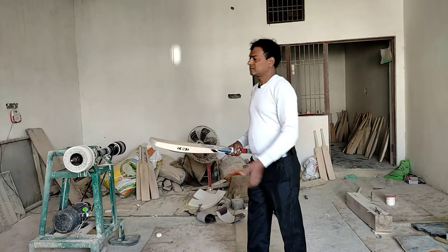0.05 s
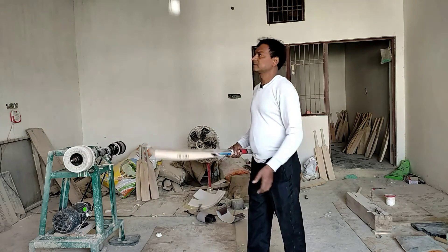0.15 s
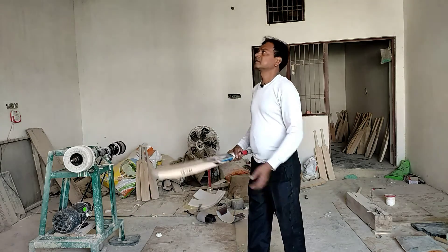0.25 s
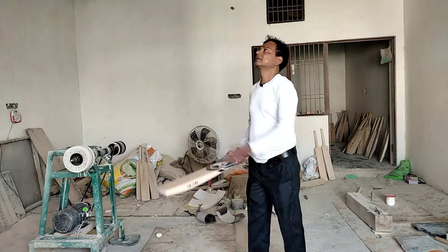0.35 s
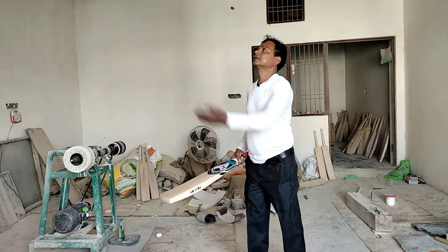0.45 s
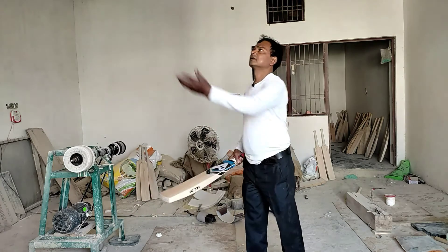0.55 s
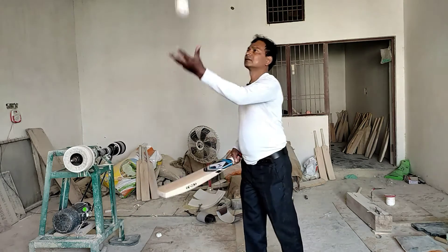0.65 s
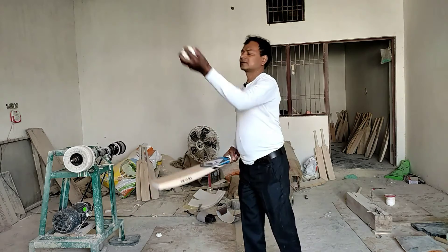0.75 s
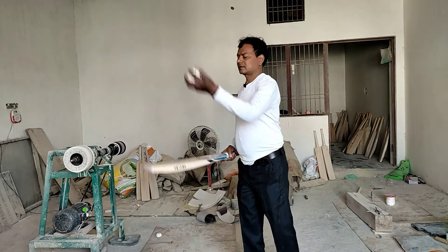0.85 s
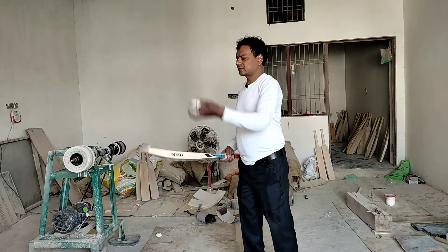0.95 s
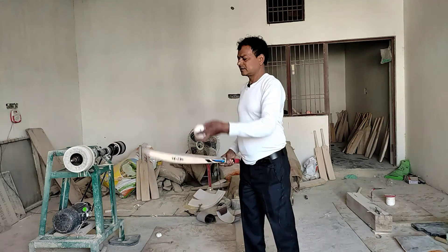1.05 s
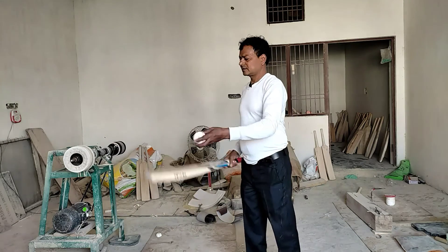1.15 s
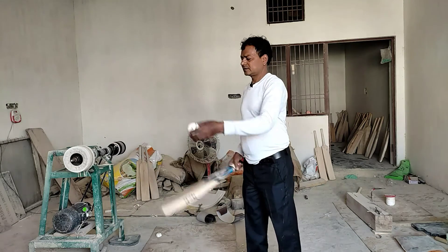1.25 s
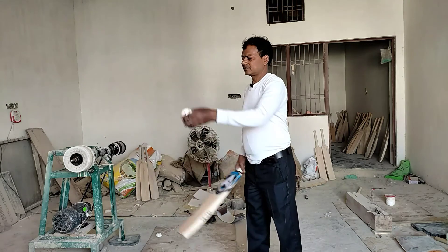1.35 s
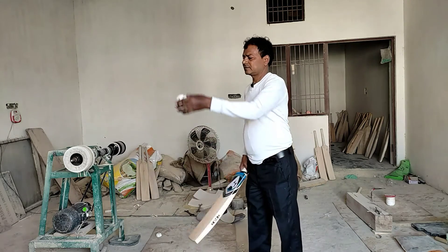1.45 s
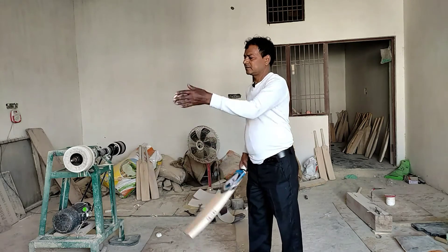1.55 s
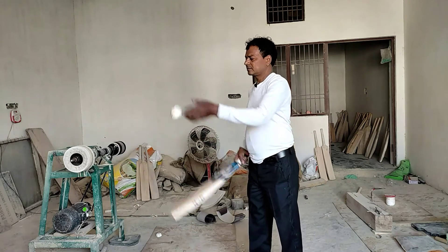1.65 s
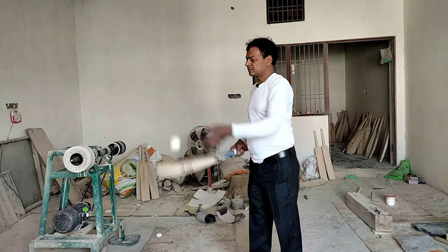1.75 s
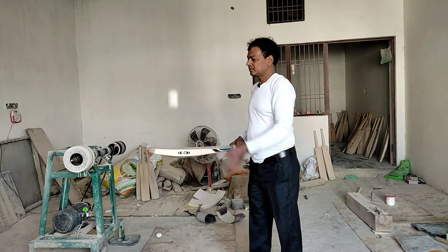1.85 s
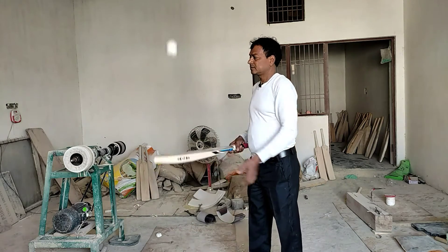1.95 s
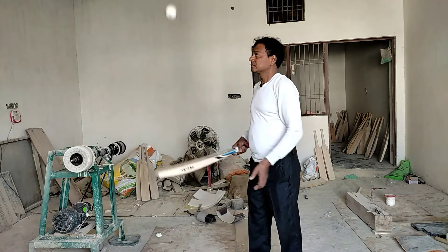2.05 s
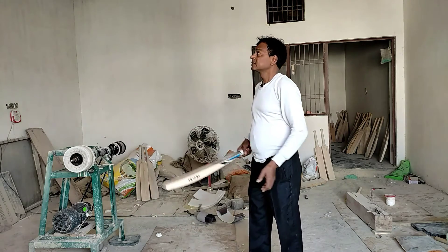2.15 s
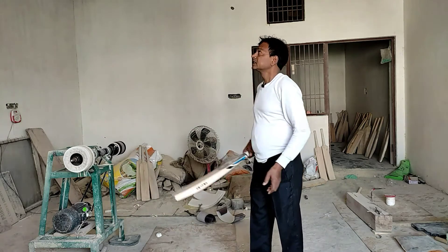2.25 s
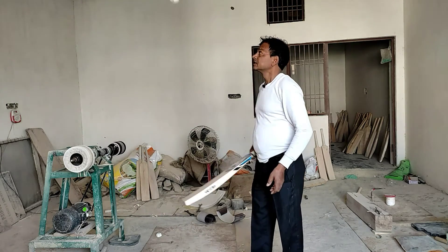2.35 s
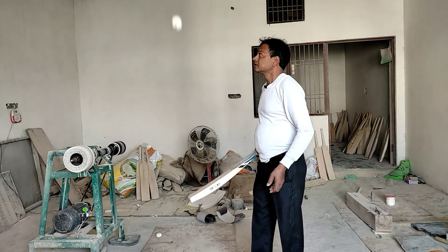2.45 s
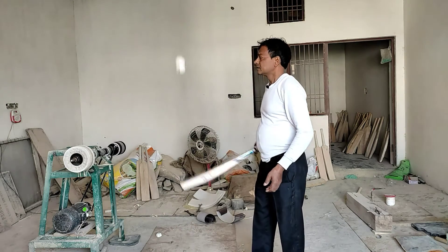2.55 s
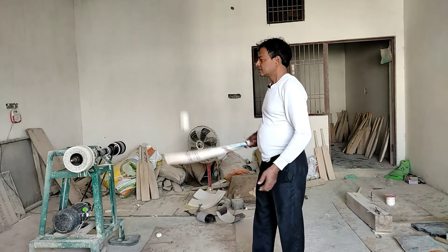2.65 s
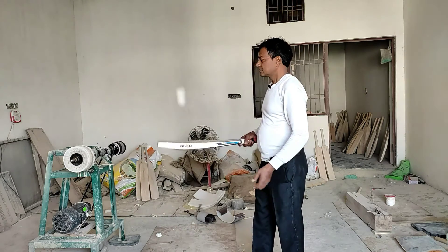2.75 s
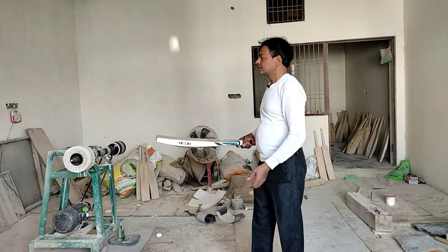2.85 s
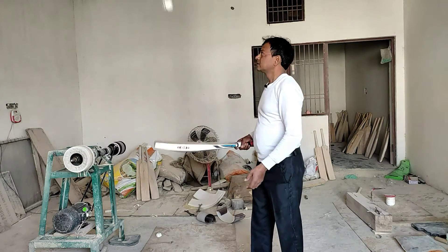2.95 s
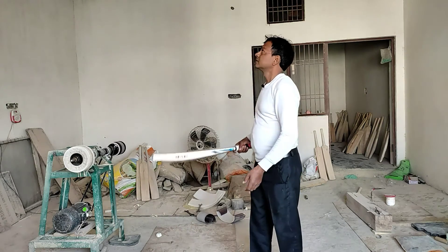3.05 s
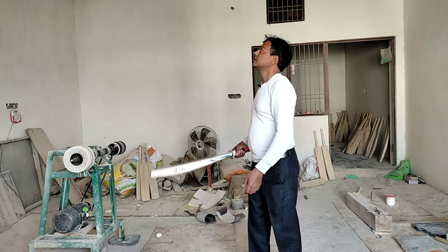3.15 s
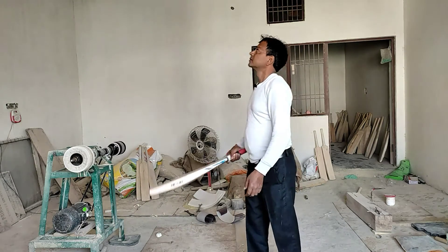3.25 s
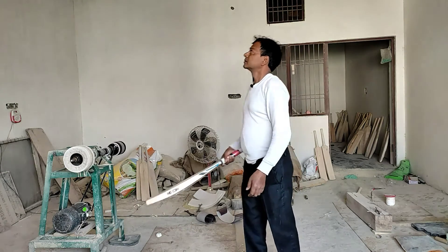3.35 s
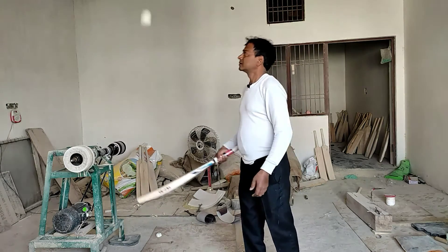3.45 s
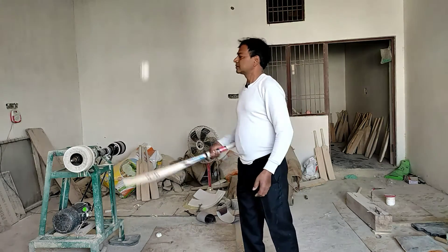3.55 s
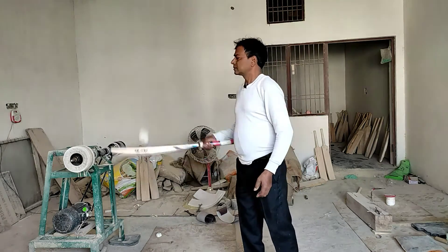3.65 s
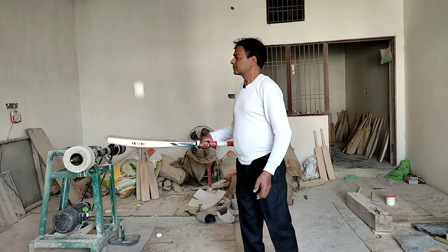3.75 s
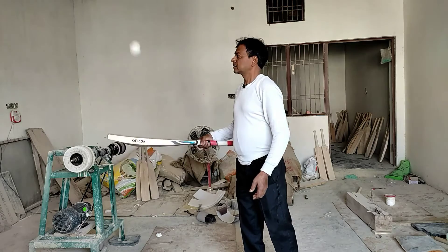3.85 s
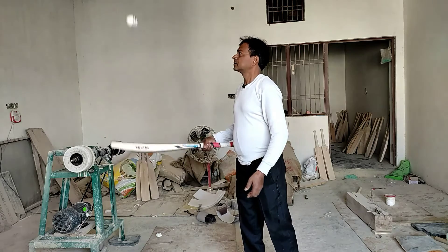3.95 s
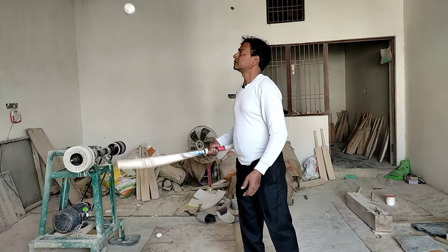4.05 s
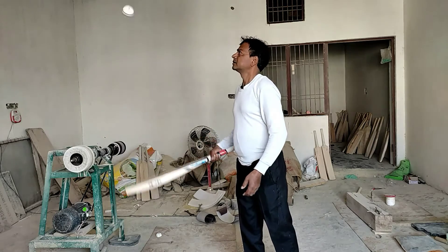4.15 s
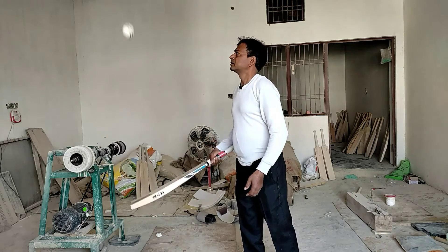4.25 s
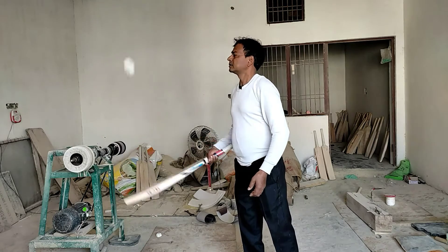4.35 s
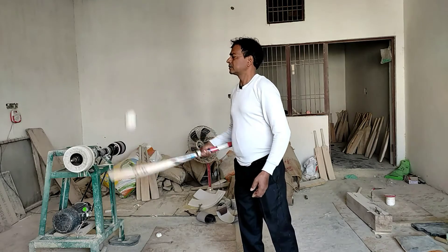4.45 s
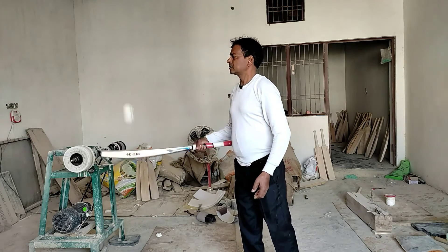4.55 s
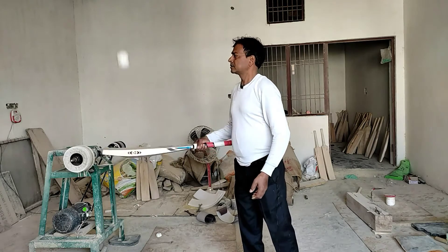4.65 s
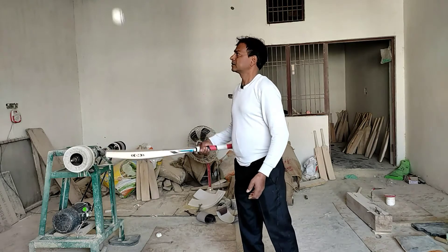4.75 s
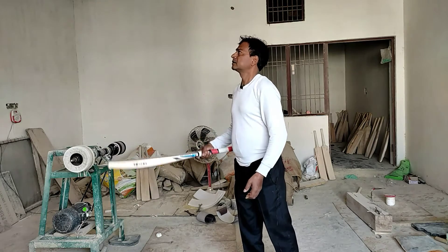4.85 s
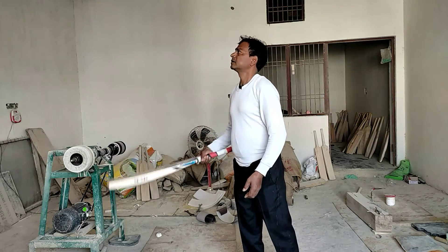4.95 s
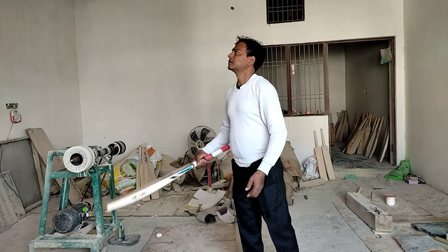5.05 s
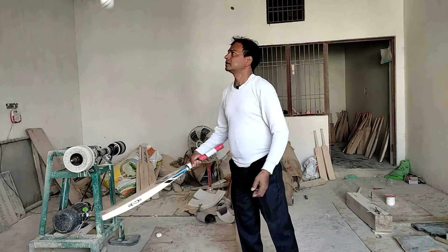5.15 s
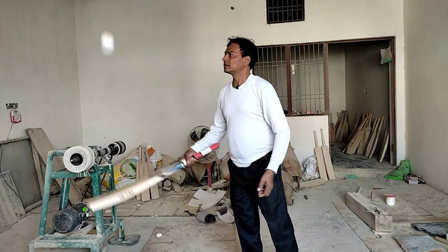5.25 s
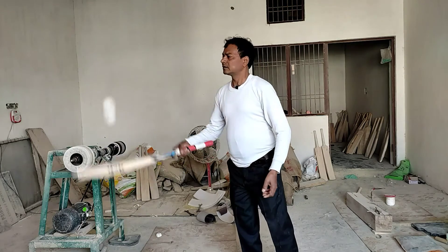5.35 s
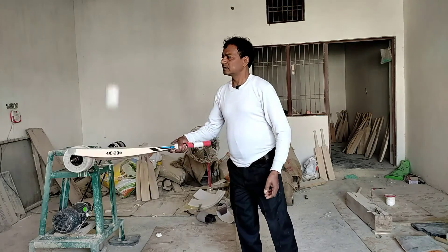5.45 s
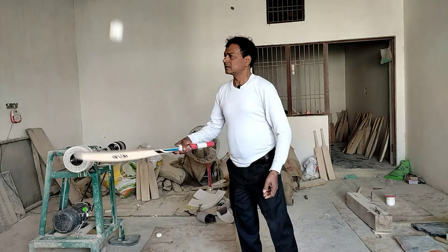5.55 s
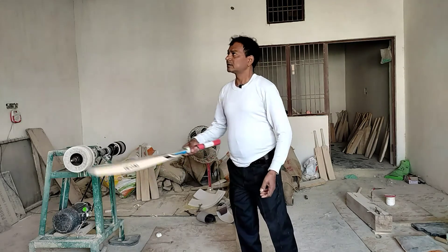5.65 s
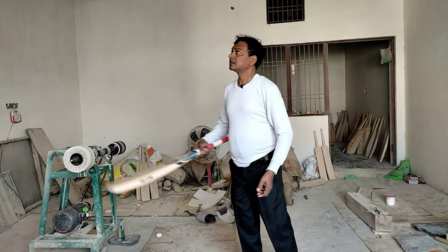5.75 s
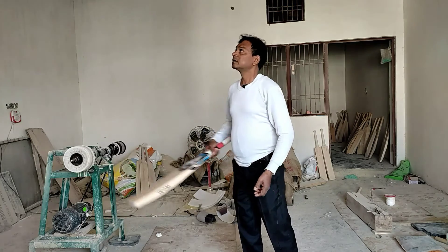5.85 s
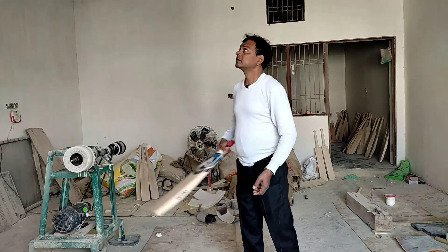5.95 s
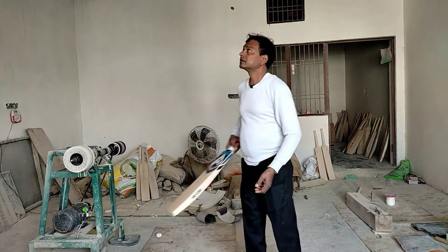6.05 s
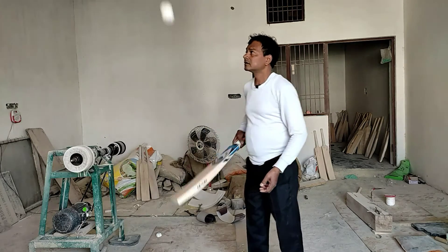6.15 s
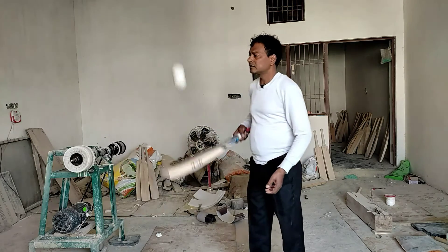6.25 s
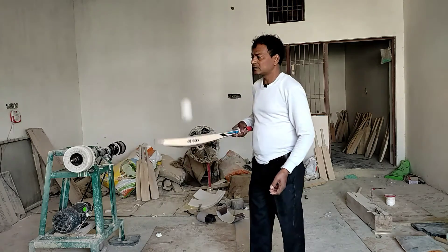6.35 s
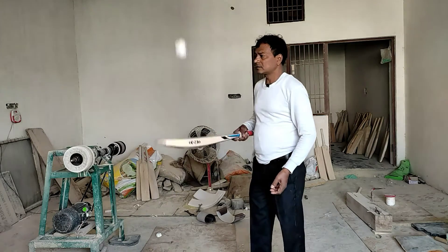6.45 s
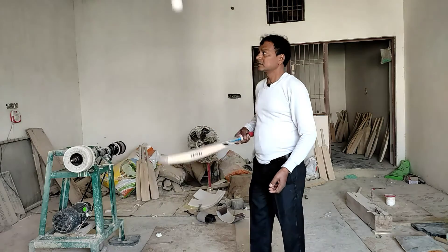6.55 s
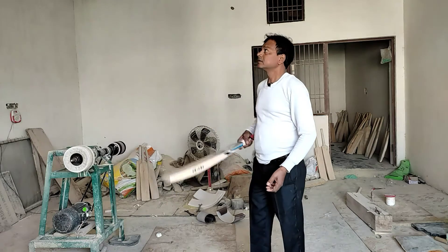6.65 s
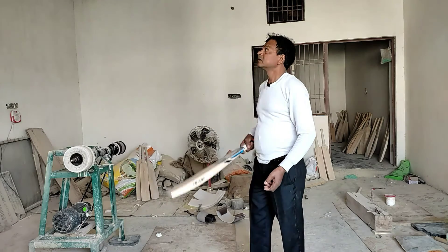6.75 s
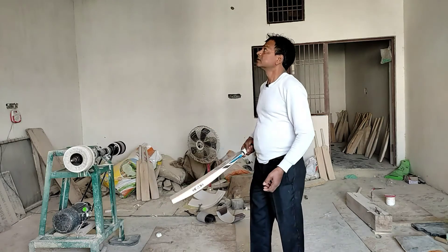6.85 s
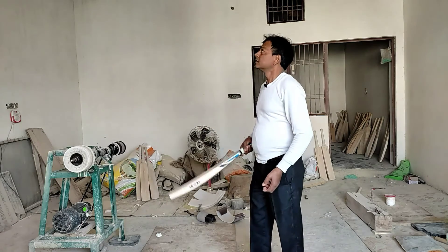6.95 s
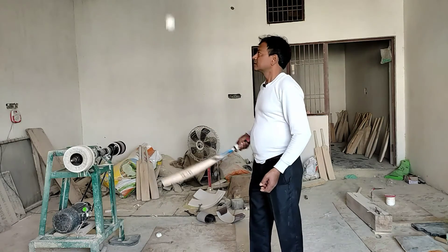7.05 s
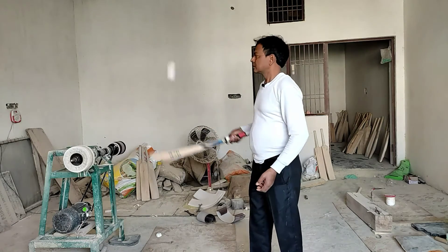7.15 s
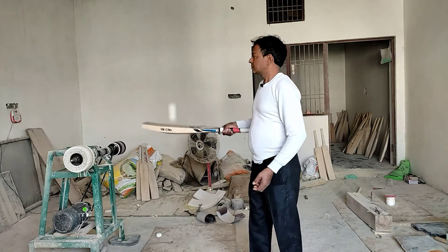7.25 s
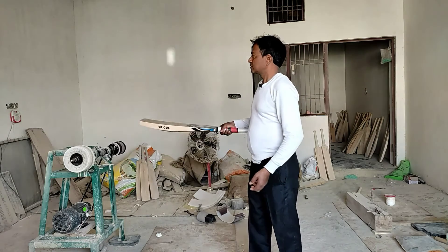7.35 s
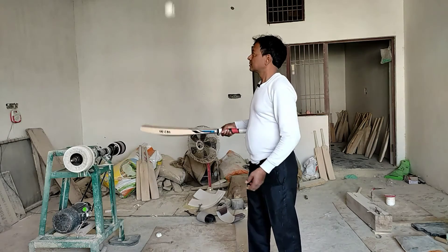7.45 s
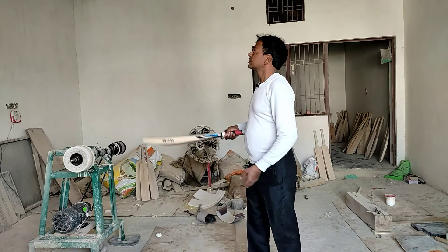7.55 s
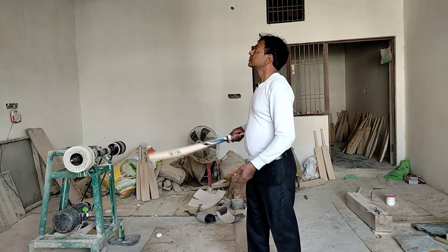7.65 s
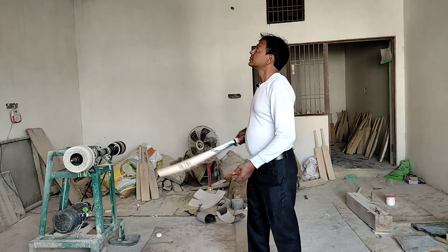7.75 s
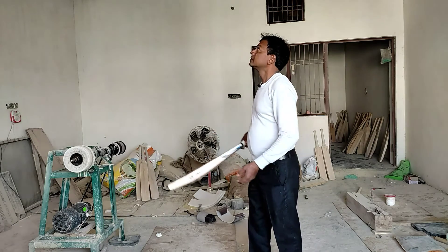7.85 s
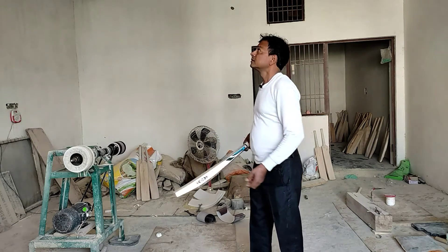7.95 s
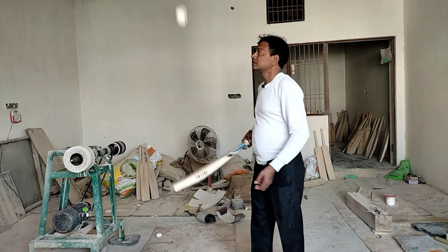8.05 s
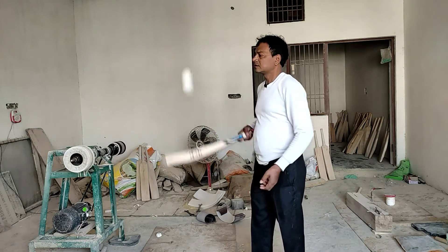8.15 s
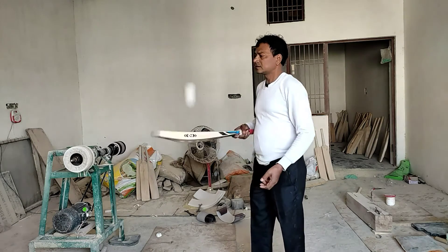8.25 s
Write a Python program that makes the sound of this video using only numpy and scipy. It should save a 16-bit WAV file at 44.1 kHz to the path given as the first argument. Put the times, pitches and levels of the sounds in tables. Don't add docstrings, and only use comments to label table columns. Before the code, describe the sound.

Loud, woody ball-on-bat knocks, first one alone, then about one a second, each followed by a swelling room echo over quiet hiss and distant machine whine.

```python
import sys
import numpy as np
from scipy import signal
from scipy.fft import rfft, irfft
from scipy.io import wavfile
from scipy.ndimage import uniform_filter1d, map_coordinates

SR = 44100
rng = np.random.default_rng(int(sys.argv[2]) if len(sys.argv) > 2 else 0)


def inscribe(sig):
    pcm = np.round(np.clip(np.atleast_2d(sig).T, -1, 1) * 32767)
    wavfile.write(sys.argv[1], SR, pcm.astype(np.int16))


def gain_from_db(level_db):
    decades = np.asarray(level_db, float) / 20
    return 10 ** decades


N = 365148

# (first touch [s], limiter lets go [s])
KNOCK_TIMES = [
    (.0685, .165),
    (1.9465, 2.034),
    (2.8554, 2.939),
    (3.8279, 3.93),
    (4.6694, 4.765),
    (5.5631, 5.649),
    (6.4918, 6.576),
    (7.4058, 7.5),
]
# (blow [dB], contact [ms], blade pitch factor [1], surface crack [dB], room share [dB])
KNOCKS = [
    (-4.5, 1.42, 1.12, -25.5, -12.5),
    (-4, 1.333, 1.14, -26, -12.5),
    (0.5, 1.254, 1.126, -25.5, -12.5),
    (-3, 1.336, 1.074, -25, -10.5),
    (-4, 1.344, 1.147, -23.5, -10.5),
    (-4, 1.374, 1.08, -28.5, -10.5),
    (1, 1.36, 1.08, -28.5, -14.5),
    (-1, 1.425, 1.1, -22, -13),
]
# (frequency [Hz], level [dB])
BALL = [
    (2500, -16),
    (2650, -11),
    (2650, -6),
    (2300, -13),
    (2650, -12),
    (2600, -22),
    (2600, -22),
    (2450, -9),
]
OVERSHOOT_DB = [2.2, 3.24, 3.8, 2.05, 2.23, 2.3, 2.85, 2.45]
# (frequency [Hz], level [dB], t60 [s])
BLADE_MODES = [(277, -7.5, 0.013), (643, -1, 0.012), (960, 11, 0.008), (1134.5, 5, 0.012),
               (1750, -7, 0.006)]
# (delay [ms], level [dB], sign [1])
ECHOES = [(-3.8, -36, 1), (-.5, -16, -1), (3.3, -19, 1), (5.3, -11, -1), (8.2, -22, 1), (10.8, -15, 1),
          (18, -17, -1), (21, -19, 1), (28, -19, 1)]
# (frequency [Hz], level [dB], t60 [s])
ROOM = [(45, -13, 0.96), (73.6, -16, 0.45), (96.1, 1.5, 2.17), (153, 1.5, 0.96), (195, -4, 1.39),
        (240, -1.5, 1.2), (429, 0.5, 1.091), (926, -8, 0.78), (1140, -9.5, 0.83), (1730, -5, 0.71),
        (2860, -6.5, 0.68), (4050, -10.5, 0.53), (8150, -12, 0.51), (15100, -3, 0.15)]
# (time [s], peak [dB], centre [Hz], t60 [s])
TICKS = [
    (0.883, -46.5, 4900, 0.015),
    (0.883, -41.5, 12500, 0.0077),
    (.912, -59, 9000, .02),
    (1.046, -64, 1500, .05),
    (1.113, -58, 9500, 0.018),
    (1.121, -53.5, 8400, 0.03),
    (1.14, -63, 9500, .04),
    (2.197, -52.5, 5140, 0.012),
    (3.196, -53, 4520, 0.011),
    (7.341, -47, 6470, 0.01),
]
# (time [s], level [dB], contact [ms])
THUDS = [
    (1.032, -14.5, 1.2),
    (6.165, -9, 1.47),
]
# (time of peak [s], peak [dB], rise [s], t60 [s])
RUSTLES = [
    (.6, -58, 0.23, 0.59),
    (.78, -65, .1, 0.38),
    (.886, -54.5, 0.0069, 0.16),
    (1.035, -56, 0.0095, 1.14),
    (1.365, -93, .01, 0.31),
    (6.172, -58, .015, 1.4),
]
# (frequency [Hz], density [dB per Hz])
RUSTLE_COLOUR = [(150, -12), (400, -2), (900, -.5), (1500, -2), (2500, -7), (3600, -13), (6000, -22),
                 (12000, -26)]
# (frequency [Hz], width [Hz], level [dB])
WHINE = [(109, 12, -72), (484, 6.1, -72.5), (805, 20, -71.5), (1209, 40, -71), (1576, 56, -74.5),
         (4420, 210, -73.5), (4630, 87, -72.5), (5490, 150, -73.5), (5930, 260, -76), (7710, 160, -77)]
# (frequency [Hz], width [Hz], level [dB])
UPPER_WHINE = [(6330, 85, -84), (7190, 290, -82), (8700, 340, -89.5)]
# (time [s], level [dB])
LOAD = [(0, 1), (1.6, 6), (2.9, 10.5), (3.4, 7), (4.36, 13), (5.5, 7), (6.3, 11.5), (7.1, 7.5),
        (8.28, 11.5)]
# (start [s], length [s], frequency [Hz], level [dB])
DRONES = [
    (1.1, .85, 528, -70),
    (1.2, .75, 818, -73),
    (2.58, .3, 1190, -67),
    (2.5, .4, 1540, -73),
]
# (time [s], level [dB])
RUMBLE = [(0.0, -44.5), (0.34, -47), (1.04, -42.5), (1.33, -41.5), (1.84, -49), (2.37, -43.5), (2.97, -53),
          (3.76, -47.5), (4.66, -52), (5.07, -45.5), (5.65, -51.5), (6.23, -43), (7.68, -52.5),
          (8.28, -48.5)]
# (frequency [Hz], density [dB per Hz])
RUMBLE_COLOUR = [(8, -26), (14, 25), (28, -37), (50, 1.5), (75, -8), (105, -22), (150, -14.5), (260, -44)]
# (frequency [Hz], density [dB per Hz])
HISS_COLOUR = [(90, -1), (130, 1), (300, 1), (550, -7.5), (900, -2.5), (1500, -4.5), (2200, -11),
               (3100, -12.5), (4200, -11.5), (5500, -14), (7400, -20), (8200, -24), (12000, -25.5),
               (15900, -29)]

DRIVE_DB, ROOM_DB = 17.7, 18.5
BUILD_MS = 13.7
ECHO_BLUR_MS = 0.21
SNAP_HZ, BALL_T60_S, GRIT_TOP_HZ, GRIT_S = 1500, 0.021, 10000, 0.00055
SAG_S, SAG_SHARE, SAG_BACK_S = 5.62, 0.06, 0.3
LOOK_AHEAD_MS, RECOVERY_MS, CLIP_KNEE, TREBLE_END_HZ = 9.3, 1.8, 14, 15400


def ball_on_bat():
    out = np.zeros(N)
    common, *tails = reverb(count=len(KNOCKS) + 1)
    blur = np.exp(-1000 / (ECHO_BLUR_MS * SR))
    for (s, _), setting, (ball_hz, ball_db), own in zip(KNOCK_TIMES, KNOCKS, BALL, tails):
        db, contact_ms, pitch, crack_db, room_db = setting
        blow, push = gain_from_db(db + DRIVE_DB) * np.array(knock(contact_ms, pitch))
        snap, grit, ring = gain_from_db(db + DRIVE_DB + crack_db) * np.array(crack(ball_hz, ball_db))
        room_db = ROOM_DB + room_db
        add(out, s, gain_from_db(room_db) * signal.fftconvolve(blow, 0.79 * common + 0.83 * own))
        add(out, s, gain_from_db(room_db + 16) * signal.fftconvolve(snap, own - common))
        add(out, s, gain_from_db(room_db + 7) * signal.fftconvolve(ring, own + common))
        add(out, s, blow - gain_from_db(-16) * push)
        add(out, s, grit + gain_from_db(8) * ring)
        dull = signal.lfilter([1 - blur], [1, -blur], blow)
        chance = rng.standard_normal((len(ECHOES), 2)) * (0.03, 1.5)
        for (ms, echo_db, sign), (late, loud_db) in zip(ECHOES, chance):
            arrival = s + ms / 1000 * (1 + late)
            add(out, arrival, sign * gain_from_db(echo_db + loud_db) * (dull if ms > 0 else blow))
            add(out, arrival, sign * gain_from_db(echo_db + 2 * loud_db - 10) * grit)
    return out


def knock(contact_ms, pitch):
    t = np.arange(3000) / SR
    push = np.sin(np.pi * np.clip(t * 1000 / contact_ms, 0, 1)) ** 2.645
    ring = sum(gain_from_db(db) * np.cos(2 * np.pi * hz * pitch * t) * decay(t, t60) for hz, db, t60 in BLADE_MODES)
    blow = -np.convolve(np.gradient(push), ring)[:len(t)]
    return blow / np.max(np.abs(blow)), push


def crack(ball_hz, ball_db):
    t = np.arange(1200) / SR
    snap = np.exp(-t * 2 * np.pi * SNAP_HZ)
    noise = signal.lfilter(*signal.butter(2, GRIT_TOP_HZ, fs=SR), rng.standard_normal(len(t)))
    grit = gain_from_db(3) * noise * np.exp(-t / GRIT_S)
    ring = gain_from_db(ball_db - 6) * np.sin(2 * np.pi * ball_hz * t) * decay(t, BALL_T60_S)
    return snap, grit, ring


def reverb(count, size=50000):
    t, f = np.arange(size) / SR, np.fft.rfftfreq(size, 1 / SR) + 1
    noise = rfft(rng.standard_normal((count, size))) / np.sqrt(SR / 2)
    out = 0
    for hz in 40 * 2 ** np.arange(0, 8.7, 1 / 3):
        band = irfft(noise * np.clip(1 - 3 * np.abs(np.log2(f / hz)), 0, 1), size)
        t60 = curve(ROOM, hz, column=2, log=True)
        out = out + band * decay(t, t60) * gain_from_db(curve(ROOM, hz, log=True))
    return out * (1 - np.exp(-(t * 1000 / BUILD_MS) ** 2))


def ticks():
    out, t = np.zeros(N), np.arange(2000) / SR
    for s, db, hz, t60 in TICKS:
        grain = shaped(lambda f: 1 / (1 + (2.2 * np.log2((f + 1) / hz)) ** 2), size=len(t))
        add(out, s - 0.001, gain_from_db(db + 4.5) * grain * decay(t, t60))
    return out + gain_from_db(-19) * signal.fftconvolve(out, reverb(count=1)[0])[:N]


def rustle():
    t, gate = np.arange(N) / SR, 0
    for s, db, rise, t60 in RUSTLES:
        fall_db = 60 * np.maximum(t - s, 0) / t60
        gate = gate + gain_from_db(db - fall_db) * np.clip(1 + (t - s) / rise, 0, 1)
    return gate * gain_from_db(3 + 2 * walk(90)) * coloured(RUSTLE_COLOUR)


def far_thuds():
    far = np.zeros(N)
    for s, db, contact_ms in THUDS:
        add(far, s, gain_from_db(db) * knock(contact_ms, pitch=0.99)[0])
    return signal.fftconvolve(far, reverb(count=1)[0])[:N]


def machine():
    t = np.arange(N) / SR
    whine = sum(gain_from_db(db + 1.6 * walk(1.5)) * band_noise(hz, width) for hz, width, db in WHINE)
    upper = sum(gain_from_db(db + 1.7 * walk(3.7)) * band_noise(hz, width) for hz, width, db in UPPER_WHINE)
    speed = 1 - SAG_SHARE * (t > SAG_S) * np.exp(-((t - SAG_S) / SAG_BACK_S) ** 2)
    upper = map_coordinates(upper, [np.cumsum(speed) - 1], mode="mirror")
    return whine + gain_from_db(curve(LOAD, t)) * upper


def street():
    t = np.arange(N) / SR
    out = gain_from_db(curve(RUMBLE, t) + 3 + 1.1 * walk(23)) * coloured(RUMBLE_COLOUR)
    for s, span, hz, db in DRONES:
        swell = np.sqrt(2 * np.sin(np.pi * np.clip((t - s) / span, 0, 1)) + 1e-12)
        tone = np.sin(2 * np.pi * hz * np.cumsum(1 + 0.00445 * walk(2.7)) / SR)
        out += gain_from_db(db + 2 * walk(10)) * swell * tone
    return out


def hiss():
    return gain_from_db(-57 + 0.6 * walk(3)) * coloured(HISS_COLOUR)


def decay(t, t60):
    return np.exp(-np.log(1000) * t / t60)


def band_noise(hz, width):
    return shaped(lambda f: 1 / (1 + (2 * (f - hz) / width) ** 2))


def coloured(table):
    return shaped(lambda f: gain_from_db(curve(table, f, log=True)) * (f > table[0][0]) * (f < table[-1][0]))


def shaped(gain_at, size=N):
    y = irfft(rfft(rng.standard_normal(size)) * gain_at(np.fft.rfftfreq(size, 1 / SR)), size)
    return y / np.std(y)


def walk(rate):
    k = int(SR / rate)
    held = np.repeat(rng.standard_normal(N // k + 1), k)
    return 1.25 * uniform_filter1d(uniform_filter1d(held, k), k)[:N]


def curve(table, at, column=1, log=False):
    rows = np.array(table, float)
    x, y = rows[:, 0], rows[:, column]
    return np.interp(np.log(at + 1e-9), np.log(x), y) if log else np.interp(at, x, y)


def add(track, s, sound):
    k = int(s * SR)
    track[k:k + len(sound)] += sound[:N - k]


def scene():
    return (ball_on_bat() + ticks() + rustle() + far_thuds() + machine() + street() + hiss())[None]


def limiter(dry):
    t, gain_db = np.arange(N) / SR, np.zeros(N)
    for (s, free), over_db in zip(KNOCK_TIMES, OVERSHOOT_DB):
        peak = np.max(np.abs(dry[0, int(s * SR):int(free * SR)]))
        depth_db = over_db - 20 * np.log10(peak)
        down = np.clip((t - s + LOOK_AHEAD_MS / 1000) / 0.00014, 0, 1)
        held = np.exp(-np.maximum(t - free + 0.002, 0) * 1000 / RECOVERY_MS)
        gain_db += depth_db * down * held
    return dry * gain_from_db(gain_db)


def top_cut(x):
    return signal.sosfilt(signal.butter(12, 16520, fs=SR, output="sos"), x)


def record(dry):
    loud = limiter(dry)
    clipped = loud / (1 + np.abs(loud) ** CLIP_KNEE) ** (1 / CLIP_KNEE)
    mix = signal.sosfiltfilt(signal.ellip(8, 0.1, 30, TREBLE_END_HZ, fs=SR, output="sos"), clipped)
    return top_cut(mix)


dry = scene()
out = record(dry)
inscribe(out)
```